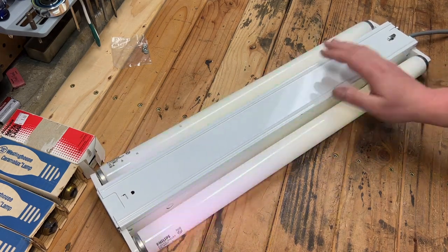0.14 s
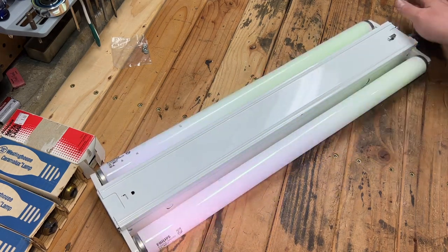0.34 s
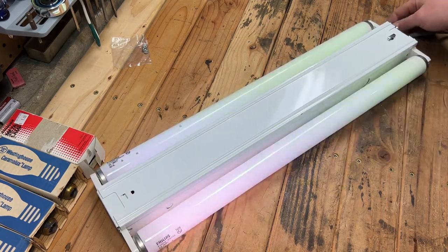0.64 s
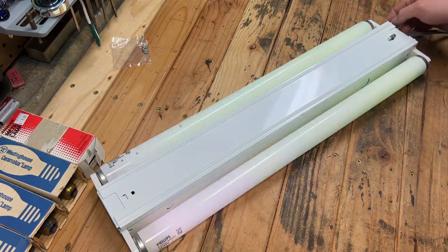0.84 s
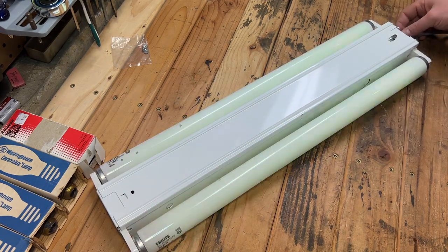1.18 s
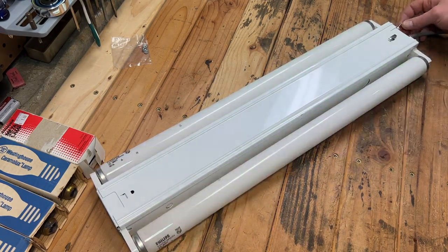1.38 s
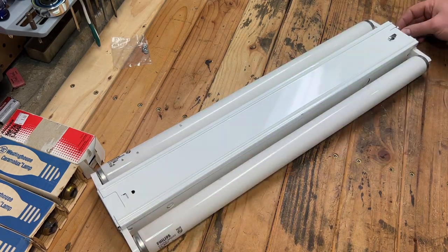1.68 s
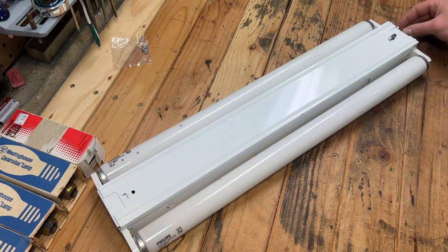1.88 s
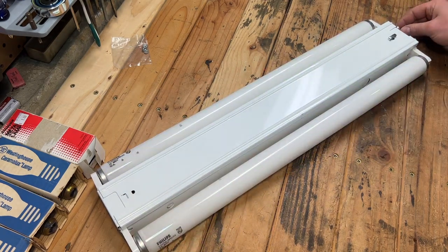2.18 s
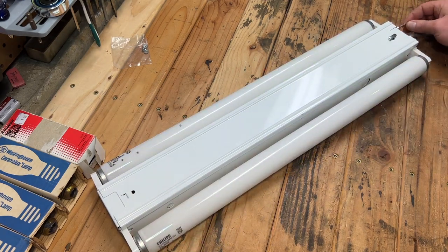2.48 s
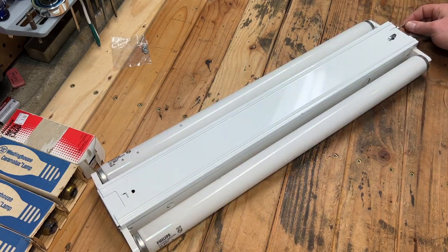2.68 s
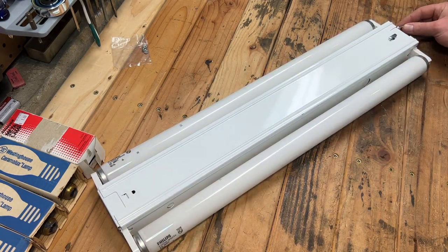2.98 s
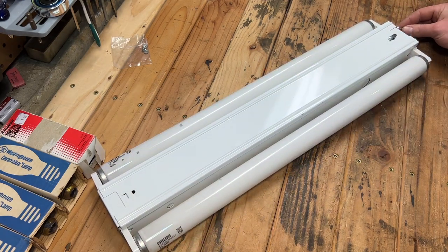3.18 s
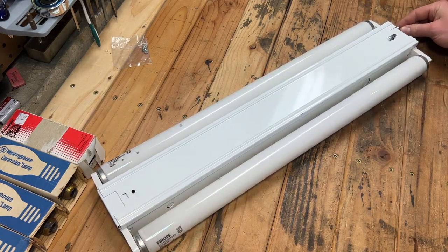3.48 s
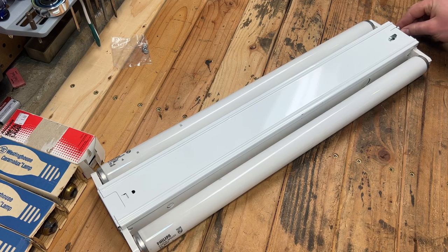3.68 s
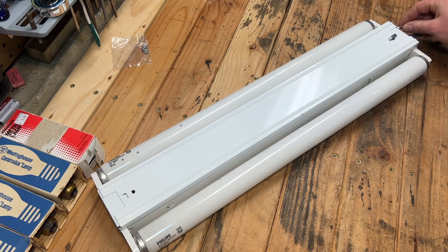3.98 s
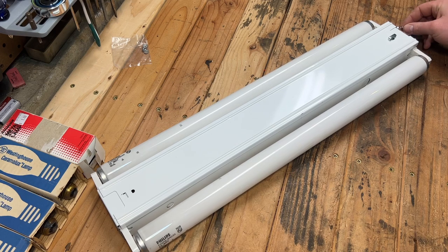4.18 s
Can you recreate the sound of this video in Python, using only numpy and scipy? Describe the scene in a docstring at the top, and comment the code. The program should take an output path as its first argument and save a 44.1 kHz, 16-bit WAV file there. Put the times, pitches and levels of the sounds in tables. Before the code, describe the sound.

Sharp little metallic clicks, rattles and dull wooden bumps as a hand fiddles with a light fixture on a workbench.

```python
"""A fluorescent fixture on a workbench

A hand works at the switch and cord of a sheet-metal fixture. As it rocks, the wooden bench booms in
short low throbs and knocks in its modes. Impact and stick-slip friction make the switch and metal
click, rattle and scrape. A faint ballast hum and a hiss from the left fill the workshop."""
import sys
import numpy as np
from scipy import signal
from scipy.fft import rfft, irfft
from scipy.io import wavfile
from scipy.ndimage import uniform_filter1d

SR = 44100
rng = np.random.default_rng(int(sys.argv[2]) if len(sys.argv) > 2 else 0)


def wrap_up_sound(samples):
    """Save the sound to the file named by the first command line argument, as 16-bit audio."""
    columns = np.atleast_2d(samples).T
    # keep every value between -1 and 1, then stretch to whole-number steps
    tamed = np.clip(columns, -1, 1)
    steps = np.round(tamed * 32767).astype(np.int16)
    wavfile.write(sys.argv[1], SR, steps)


N = 191462
T = np.arange(N) / SR
F = np.maximum(np.fft.rfftfreq(N, 1 / SR), 1)

# Throbs of the bench top. Each row: crest time in seconds, level in dB, frequency in Hz.
THROBS = [(0.03, -37.5, 70), (0.101, -23, 83.5), (0.193, -27.5, 79.5), (0.281, -26, 85.4),
          (0.32, -31.5, 70), (0.382, -27.5, 77), (0.427, -23.5, 94.3), (0.462, -27.5, 88),
          (0.523, -36, 66.6), (0.561, -29, 75.6), (0.614, -28, 78), (0.658, -35.5, 81), (0.741, -29, 76.6),
          (0.792, -36, 81), (0.832, -32, 78.4), (0.887, -33, 75), (0.953, -34, 71.3), (1.009, -41.5, 80),
          (1.087, -36, 71.7), (1.14, -46, 70), (1.41, -40.5, 80.2), (1.447, -25, 87), (1.502, -37, 86.5),
          (1.584, -38.5, 70), (1.624, -35.5, 77), (1.695, -27, 77.7), (1.765, -32.5, 78),
          (1.872, -32.5, 65.6), (1.963, -39, 81.4), (2.53, -40, 84), (2.583, -39, 74), (2.666, -30, 85.6),
          (2.72, -38.5, 83), (2.893, -34.5, 94.5), (2.994, -40, 72), (3.115, -40, 70), (3.3, -47, 71.7),
          (3.418, -47, 79), (3.474, -40, 76), (3.528, -41, 77.73), (3.698, -40, 80), (3.765, -45, 67.6),
          (3.815, -45.5, 77), (4.023, -43, 81.5), (4.189, -38.5, 72.5), (4.271, -42, 72.7)]
# Clicks at the switch end. Each row: start in seconds, level in dB, relative treble in dB,
# T60 in seconds, clack pitch in Hz.
SWITCH_CLICKS = [(0.5783, -37.5, -9, 0.093, 1880), (0.7032, -37.5, -16.5, 0.11, 2090),
                 (0.8048, -39.5, -2, 0.082, 2380), (0.8457, -56, 1, 0.053, 1940),
                 (0.912, -42.5, -21, 0.093, 2100), (0.9797, -42.5, -20, 0.22, 1480),
                 (1.33, -45.5, -4, 0.52, 1580), (1.371, -17, -4, 0.12, 1970),
                 (1.5438, -42, -27, 0.14, 2140), (1.553, -31, -10, 0.072, 2120),
                 (1.5705, -33.5, -10, 0.17, 2020), (2.0772, -38.5, -25.5, 0.29, 1580),
                 (2.2195, -43, -16, 0.23, 1570), (2.4065, -45.5, -10.5, 0.42, 1480),
                 (2.436, -38.5, -20, 0.45, 1560), (2.456, -22, -12, 0.13, 1550),
                 (2.8611, -36, -29.5, 0.095, 1560), (2.878, -32, -13.5, 0.16, 1630),
                 (2.997, -46.5, -13, 0.17, 1570), (3.0655, -46, -31, 0.082, 1480),
                 (3.109, -47, -7.5, 0.16, 2140), (3.1659, -44, -20, 0.63, 2050),
                 (3.197, -45, -17, 0.18, 1500), (3.2562, -41, -22, 0.06, 1570),
                 (3.2864, -30, -21.5, 0.1, 2080), (3.304, -33.5, -14, 0.1, 2030),
                 (3.337, -42.5, -19, 0.11, 2170), (3.411, -45.5, -36, 0.11, 1595),
                 (3.4927, -23, -14.5, 0.12, 1892), (3.5761, -23, -12, 0.14, 1530),
                 (3.6386, -36.5, -26, 0.16, 2230), (3.8571, -38, -19.5, 0.29, 1930),
                 (4.1265, -46, -26, 0.2, 1600), (4.1617, -44, -20, 0.19, 1625),
                 (4.2437, -44.5, -16, 0.13, 2040), (4.2702, -37, -20.5, 0.2, 1550)]
# Fingers and cord dragging on metal. Each row: start, crest and end in seconds, body level in dB,
# treble level in dB. A stroke is silent past its end, even if that precedes its start or crest.
SCRAPE_STROKES = [(0.563, 0.572, 0.75, -57, -69), (0.668, 0.693, 0.92, -56.5, -61.5),
                  (0.754, 0.799, 1.13, -64.5, -60), (1.279, 1.371, 1.388, -45.5, -53.5),
                  (1.495, 1.583, 1.7, -52, -49.5), (2.005, 2.113, 2.12, -58, -60.5),
                  (2.39, 2.457, 2.43, -55.5, -61), (2.82, 2.856, 3.074, -56.5, -59),
                  (3.03, 3.108, 3.2, -56.5, -63), (3.244, 3.339, 3.36, -57.5, -63),
                  (3.416, 3.454, 3.96, -66, -73.5), (3.599, 3.642, 3.49, -50, -72.5),
                  (3.867, 3.94, 3.68, -55.5, -65.5), (4.105, 4.185, 4.2, -60.5, -75)]
# Knocks of the housing on wood. Each row: start in seconds, level in dB, pitch struck hardest in Hz.
HOUSING_KNOCKS = [(0.081, -37.5, 230), (0.163, -38, 207), (0.26, -39.5, 162), (0.355, -36, 179),
                  (0.398, -33.5, 392), (0.535, -35, 195), (0.714, -37.5, 190), (0.848, -43.5, 170),
                  (0.954, -44, 437), (1.05, -52, 543), (1.325, -55.5, 322), (1.378, -39, 564),
                  (1.565, -47, 540), (1.593, -42.5, 233), (1.678, -45, 151), (1.736, -50, 253),
                  (1.842, -49.5, 187), (1.938, -57.5, 250), (2.072, -55.5, 490), (2.435, -53, 536),
                  (2.455, -41.5, 610), (2.579, -50.5, 149), (2.641, -51, 167), (2.871, -42.5, 380),
                  (2.958, -60.5, 258), (3.117, -54.5, 520), (3.226, -51.5, 501), (3.301, -51, 505),
                  (3.412, -53, 520), (3.491, -45.5, 530), (3.554, -36, 425), (3.796, -53, 193.3),
                  (4.162, -49, 502), (4.261, -49.5, 152)]
# Muffled taps of the housing edge just ahead of a knock. Each row: start in seconds, level in dB.
EDGE_TAPS = [(0.07, -40.5), (0.152, -35.5), (0.246, -48), (0.343, -39.5), (0.522, -43), (0.702, -44.5),
             (0.951, -48), (1.732, -55.5)]
# A thin high hiss that comes and goes. Each row: time in seconds, level in dB.
THIN_HISS_LEVELS = [(0.0, -85.5), (0.4, -88), (1.0, -91), (1.5, -87.5), (1.8, -92), (3.0, -97.5),
                    (3.4, -90.5), (3.9, -94), (4.34, -88.5)]

# Modes of bench, housing and small parts. Each row: frequency in Hz, level in dB, T60 in seconds.
BENCH_MODES = [(183, -1, 0.12), (253, 6.5, 0.068), (294, 3.5, 0.037), (395, 3.5, 0.078), (494.5, -1.5, .15),
               (541, 0, 0.14), (585, 0, 0.032), (641, -15, 0.11)]
HOUSING_MODES = [(1334, -6.5, 0.058), (1510, -6, 0.18), (1579.7, 2, 0.085), (1723, -12, 0.045),
                 (1884, 2, 0.025), (2037, 2.5, 0.055), (2152, -2.5, 0.058), (2365, -1.5, 0.047),
                 (3160, -5.5, 0.11), (3550, 0.5, 0.045)]
SMALL_PART_MODES = [(4400, -15, .09), (4710, -3, 0.09), (4820, -3.5, 0.032), (5074, -2, 0.067),
                    (4900, -3, 0.075), (5100, -0.5, 0.085), (6000, -9, 0.095), (7650, -4.5, 0.057),
                    (8260, -10, 0.0675)]
# Spectra of the metal's three noise bands, the knocks' puff, the taps and the room air.
# Each row: frequency in Hz, relative spectral density in dB.
BODY_SPECTRUM = [(300, -12.5), (700, -6), (1100, -9), (1600, -6.5), (2200, -1.5), (2700, -7), (3400, -12),
                 (4200, -46)]
TREBLE_SPECTRUM = [(2600, -17.5), (3200, -8), (3700, -9.5), (4100, -9.5), (4600, -6), (5200, -3.5),
                   (6300, -9.5), (7700, -4.5), (9000, -6), (10200, -23), (11500, -46)]
TOP_SPECTRUM = [(9000, -40), (10300, -13.5), (11600, 0.5), (13500, 0.5), (14800, 0.5), (15700, -7.5),
                (16700, -20.5)]
PUFF_SPECTRUM = [(100, -17), (180, 0), (300, 0), (550, -2.5), (800, -14), (1300, -21), (3000, -46.5)]
TAP_SPECTRUM = [(400, 3.5), (700, -5), (1000, -1), (1300, -11.5), (2000, -14.5), (3000, -31), (5000, -52)]
AIR_SPECTRUM = [(25, -34), (45, -3), (100, -5), (140, -15.5), (175, -24.5), (380, -25), (440, -30),
                (500, -23), (700, -40.5), (1050, -27.5), (1250, -36.5), (1950, -25.5), (2450, -37),
                (4300, -48), (6700, -47.5), (8000, -56), (9500, -59), (12000, -97)]
FLAT_SPECTRUM = [(100, 0), (16000, 0)]
# Likeness of the ears for contacts and air. Each row: frequency in Hz, left-right correlation.
CONTACT_COHERENCE = [(150, 0.98), (300, 0.68), (600, 0.24), (1200, 0.64), (2200, 1), (3500, 0.57),
                     (6000, 0.47), (8000, 1), (15000, 0.73)]
AIR_COHERENCE = [(60, 1), (400, 0.45), (1000, 0.22), (3000, .1), (8000, 0.24), (11000, 0.98)]
# Sideways lean of contacts and air. Each row: frequency in Hz, left minus right level in dB.
CONTACT_PAN = [(300, 1), (1700, -1), (3100, 1.5), (5000, 6.5), (7000, 0.5), (15000, -0.5)]
AIR_PAN = [(60, 6), (350, -1.5), (1000, 6), (1800, 13), (4000, 7.5), (6500, 15), (7900, 22.5), (8700, 4.5),
           (9500, -3.5)]

THROB_CYCLES = 2.03   # width of a throb's crest
TREMBLE_DB, TREMBLE_T60_S, TREMBLE_BAND_HZ = -21.5, 0.81, (56.5, 93)
CLICK_RISE_S, CRACK_RISE_S, CRACK_T60_S = 0.0043, 0.0011, 0.04
CATCHES_PER_S, CATCH_DB, CATCH_T60_S = 82, -2.5, 0.026
HUM_HZ, HUM_DB, AIR_DB = 120.8, -61, -57.5
SHOP_T60_S, SHOP_DB = 0.28, -14
PORT_HZ, PORT_WIDTH_HZ, PORT_LAG_S = 10370, 2250, 12e-6
BASS_CUT_HZ, STOPBAND_HZ = 35.5, 16800


def bench_booms():
    """Forced vibration: each rock drives the bench's lowest modes for a few cycles, then they tremble."""
    throbs, phases = np.zeros(N), rng.uniform(0, 2 * np.pi, len(THROBS))
    for (crest, db, hz), phase in zip(THROBS, phases):
        near = np.abs(T - crest) < 0.2
        t = T[near] - crest
        swell = from_db(db) * np.exp(-2 * (t * hz / THROB_CYCLES) ** 2)
        throbs[near] += swell * np.cos(2 * np.pi * hz * t + phase)
    crests, db, _ = np.transpose(THROBS)
    settling = decays(crests, db + TREMBLE_DB, TREMBLE_T60_S, rise_s=0.014)
    tremble = settling * band_noise(TREMBLE_BAND_HZ, order=2)
    return (throbs + tremble) * from_db([[1.3], [-1.3]])


def fixture_metal():
    """Resonance: the noise of clicks and scrapes radiates directly and shakes housing and small parts."""
    envelopes = click_envelopes() + scrape_envelopes()
    slip_power = grit(spread_db=2.2, grain=150)[0] ** 2
    slips = np.sqrt(uniform_filter1d(slip_power, size=60))   # stick-slip shakes all bands together
    body, treble, top = (slips * band * grit(spread_db=0.71, grain=30) for band in envelopes)
    starts, db, _, _, pitch_hz = np.transpose(SWITCH_CLICKS)
    clack = struck(HOUSING_MODES, starts, db - 16.5, pitch_hz, slope_db=19.5, contact_s=0.0046)
    housing = clack * [[1.3], [0.45]] + from_db(-15.5) * shaken(body, HOUSING_MODES)
    rattle = from_db(-14.5) * shaken(treble, SMALL_PART_MODES)
    noise = coloured(body, BODY_SPECTRUM) + coloured(treble, TREBLE_SPECTRUM)
    return noise + coloured(top, TOP_SPECTRUM) + coloured(housing + rattle, FLAT_SPECTRUM)


def click_envelopes():
    """Impact transients: a short crack opens each click's decay in the body, treble and top bands."""
    starts, db, treble_db, t60, _ = np.transpose(SWITCH_CLICKS)
    top_db = 1.49 * treble_db   # in a dull click the top drops faster than the treble

    def burst(click_db, crack_db, click_t60):
        crack = decays(starts, crack_db, CRACK_T60_S, CRACK_RISE_S)
        return crack + decays(starts, click_db, click_t60, CLICK_RISE_S)

    body = burst(db - 19.5, db - 22.5, t60)
    treble = burst(db + treble_db - 6, db + treble_db - 9.5, 0.73 * t60)
    top = burst(db + top_db - 6, db + top_db - 8, 0.71 * t60)
    return np.array([body, treble, top])


def scrape_envelopes():
    """Sliding friction: each stroke swells, and the finger catches in ticks in the upper two bands."""
    ticks = (rng.random(N) < CATCHES_PER_S / SR) * from_db(CATCH_DB + 2.2 * rng.standard_normal(N))
    catches = 0.77 + signal.lfilter([1], [1, -from_db(-60 / (CATCH_T60_S * SR))], ticks)
    body, treble, top = np.zeros((3, N))
    for start, crest, end, body_db, treble_db in SCRAPE_STROKES:
        stroke = np.interp(T, [start, crest, end], [0, 1, 0]) ** 2
        body += from_db(body_db) * stroke
        treble += from_db(treble_db - 5) * stroke * catches
        top += from_db(treble_db - 9) * stroke * catches
    return np.array([body, treble, top])


def bench_knocks():
    """Free vibration: the wood rings after each blow of the housing, amid a dull puff of noise."""
    starts, db, pitch_hz = np.transpose(HOUSING_KNOCKS)
    wood = struck(BENCH_MODES, starts, db, pitch_hz, slope_db=17, contact_s=0.057)
    puff = decays(starts, db - 9.5, t60=0.37, rise_s=0.023) * rng.standard_normal((2, N))
    return wood * from_db([[0.6], [-0.6]]) + coloured(puff, PUFF_SPECTRUM)


def edge_taps():
    """Impact noise: the housing edge makes a brief hard contact that leaves a muffled, gritty decay."""
    starts, db = np.transpose(EDGE_TAPS)
    contact = decays(starts, db - 3, t60=0.03, rise_s=0.0004)
    tail = decays(starts, db - 3, t60=0.18, rise_s=0.0004)
    return coloured((contact + tail) * grit(spread_db=3.6, grain=40), TAP_SPECTRUM)


def workshop_reverb(sound):
    """Diffuse reflection: each ear receives its own low-passed, exponentially decaying tail."""
    t = T[:SR // 2]
    tail = rng.standard_normal((2, len(t))) * from_db(-60 * t / SHOP_T60_S) * (t > 0.006)
    tail = signal.lfilter([1], [1, -0.5], tail)
    tail /= np.sqrt(np.sum(tail ** 2, axis=1, keepdims=True))
    return from_db(SHOP_DB) * signal.fftconvolve(sound, tail, axes=1)[:, :N]


def ballast_hum():
    """Simple harmonic motion: the ballast radiates one steady low tone."""
    return from_db(HUM_DB) * np.sin(2 * np.pi * HUM_HZ * T)


def room_air():
    """Ambient noise: a steady rumble and hiss lean left, and a thin centred hiss comes and goes."""
    air = coloured(rng.standard_normal((2, N)), AIR_SPECTRUM, AIR_COHERENCE, AIR_PAN)
    thin_db = np.interp(T, *np.transpose(THIN_HISS_LEVELS))
    return from_db(AIR_DB) * air + from_db(thin_db) * band_noise((11300, 15000), order=3)


def struck(modes, starts, db, pitch_hz, slope_db, contact_s):
    """Modal excitation: a blow feeds each mode over its contact, slope_db less per octave off pitch."""
    onsets, out = (starts * SR).astype(int), np.zeros(N)
    draws = rng.normal(0, 1, (len(starts), len(modes), 2)).transpose(1, 2, 0)
    push = 2 * (1 - from_db(-60 / (contact_s * SR)))
    for (hz, mode_db, t60), (scatter, polarity) in zip(modes, draws):
        off_pitch_db = slope_db * np.abs(np.log2(hz / pitch_hz))
        blows = np.zeros(N)
        blows[onsets] = from_db(db + mode_db - off_pitch_db + 2.24 * scatter) * np.sign(polarity)
        out += ring(push * ring(blows, hz, contact_s), hz, t60)
    return out


def shaken(drive, modes):
    """Random excitation: noise sustains each mode at a power independent of its damping."""
    return sum(from_db(db) * np.sqrt(2 - 2 * from_db(-120 / (t60 * SR))) * ring(drive, hz, t60)
               for hz, db, t60 in modes)


def ring(drive, hz, t60):
    """Damped oscillator: a unit impulse starts a decaying sine of unit height."""
    radius, angle = from_db(-60 / (t60 * SR)), 2 * np.pi * hz / SR
    return signal.lfilter([0, np.sin(angle)], [1, -2 * radius * np.cos(angle), radius ** 2], drive + 1e-18)


def decays(starts, db, t60, rise_s):
    """Exponential damping: an envelope rises at each start and falls 60 dB in t60 seconds."""
    out = np.zeros(N)
    for start, level, length, rise in np.broadcast(starts, db, t60, rise_s):
        onset = int(start * SR)
        t = T[:N - onset][:int(1.5 * length * SR)]
        out[onset:onset + len(t)] += from_db(level - 60 * t / length) * (1 - np.exp(-t / rise))
    return out


def grit(spread_db, grain):
    """Uneven micro-contacts: two noises share a level that wanders over about grain samples."""
    roughness = uniform_filter1d(rng.standard_normal(N), size=grain) * np.sqrt(grain)
    return rms_one(from_db(spread_db * roughness) * rng.standard_normal((2, N)))


def band_noise(edges_hz, order):
    """Band limiting: white noise is filtered to one band at unit rms."""
    band = signal.butter(order, edges_hz, "band", fs=SR, output="sos")
    return rms_one(signal.sosfilt(band, rng.standard_normal(N)))


def coloured(pair, spectrum, coherence=CONTACT_COHERENCE, pan=CONTACT_PAN):
    """Partial coherence: mid and side mix into left and right, shaped by a unit-power spectrum."""
    mid, side = rfft(pair)
    alike, gain = np.clip(at_hz(coherence), -1, 1), from_db(at_hz(spectrum))
    sign = np.array([[1], [-1]])
    ears = np.sqrt(1 + alike) * mid + np.sqrt(1 - alike) * side * sign
    ears *= from_db(sign * at_hz(pan) / 2)
    return irfft(ears * gain / np.sqrt(2 * np.mean(gain ** 2)), N)


def at_hz(points):
    """Interpolation in log frequency carries a table onto the FFT grid."""
    hz, value = np.transpose(points)
    return np.interp(np.log(F), np.log(hz), value)


def from_db(db):
    """Amplitude grows tenfold every 20 dB."""
    return 10 ** (np.asarray(db) / 20)


def rms_one(x):
    """Normalisation brings a signal to unit rms."""
    return x / np.sqrt(np.mean(x ** 2) + 1e-20)


def scene():
    """Superposition: fixture and bench add to their reverberation, the room air and the hum."""
    contacts = fixture_metal() + bench_knocks() + edge_taps()
    booms = bench_booms()
    background = room_air() + ballast_hum()
    return contacts + booms + workshop_reverb(contacts + from_db(-6.5) * booms) + background


def record(dry):
    """All-pass resonance: the right port turns the phase once round; deep bass and the top are cut."""
    radius = np.exp(-np.pi * PORT_WIDTH_HZ / SR)
    poles = [1, -2 * radius * np.cos(2 * np.pi * PORT_HZ / SR), radius ** 2]
    late = irfft(rfft(dry[1]) * np.exp(-2j * np.pi * F * PORT_LAG_S), N)   # this port lies further off
    ports = np.array([dry[0], signal.lfilter(poles[::-1], poles, late)])
    ports = signal.sosfilt(signal.butter(2, BASS_CUT_HZ, "high", fs=SR, output="sos"), ports)
    return signal.sosfilt(signal.cheby2(12, 70, STOPBAND_HZ, fs=SR, output="sos"), ports)


dry = scene()
out = record(dry)
wrap_up_sound(out)
```